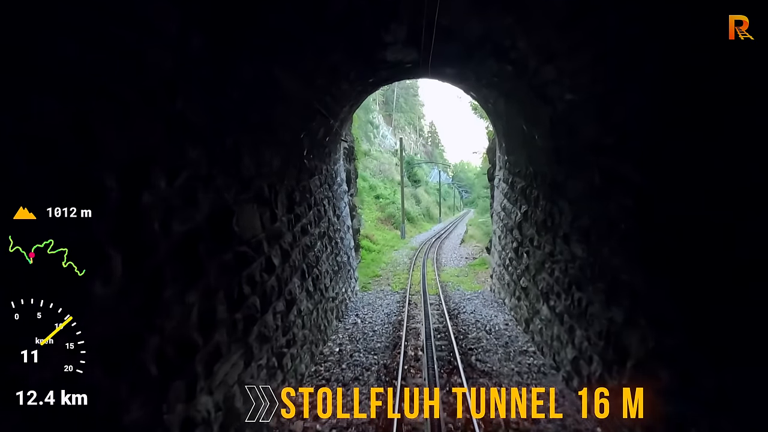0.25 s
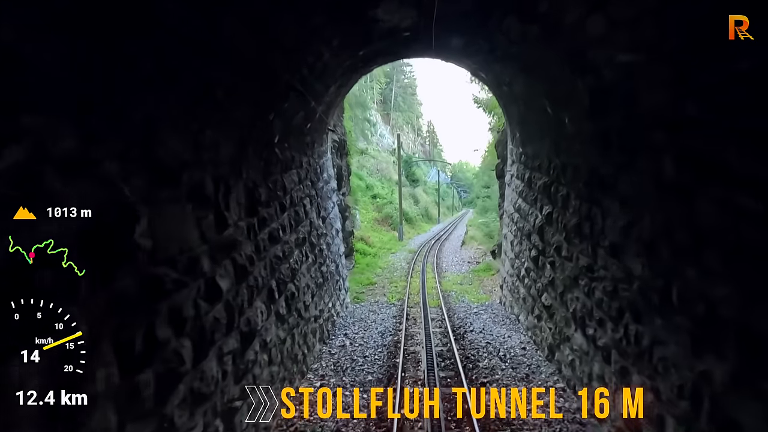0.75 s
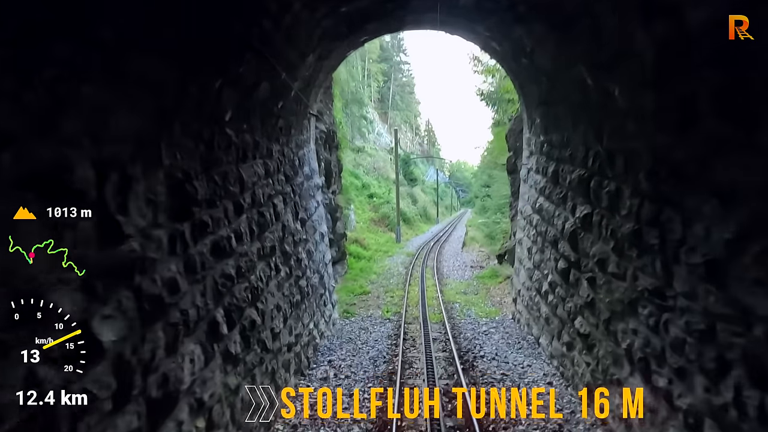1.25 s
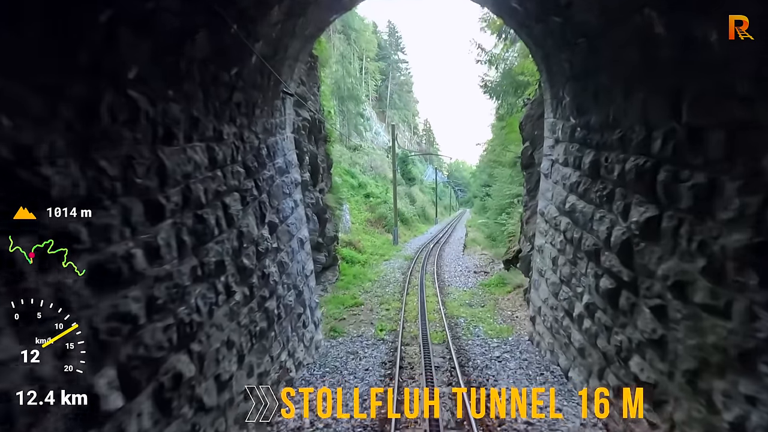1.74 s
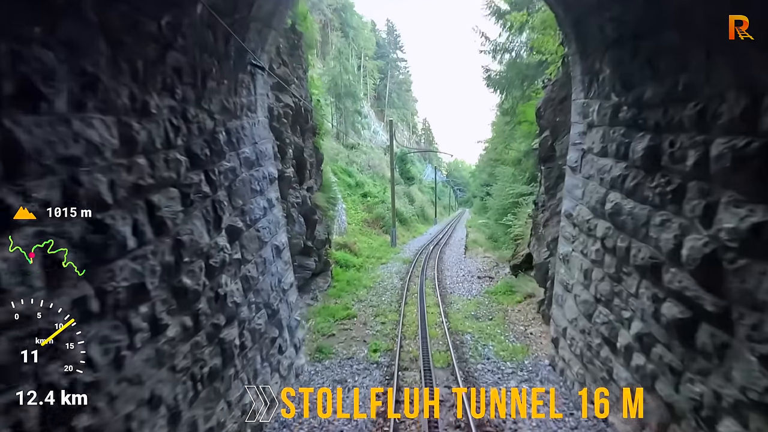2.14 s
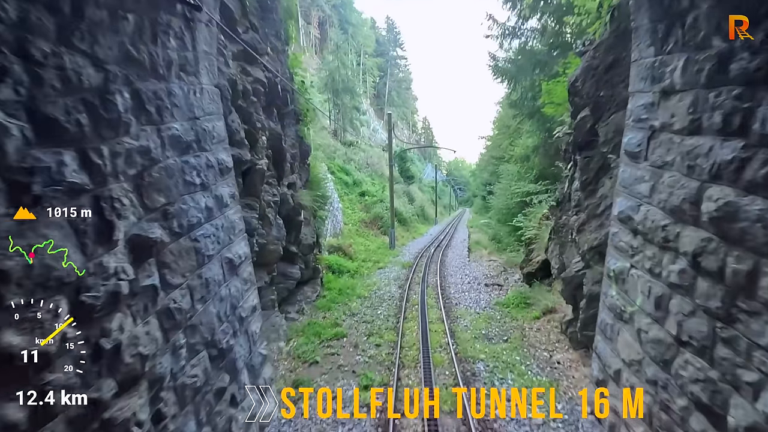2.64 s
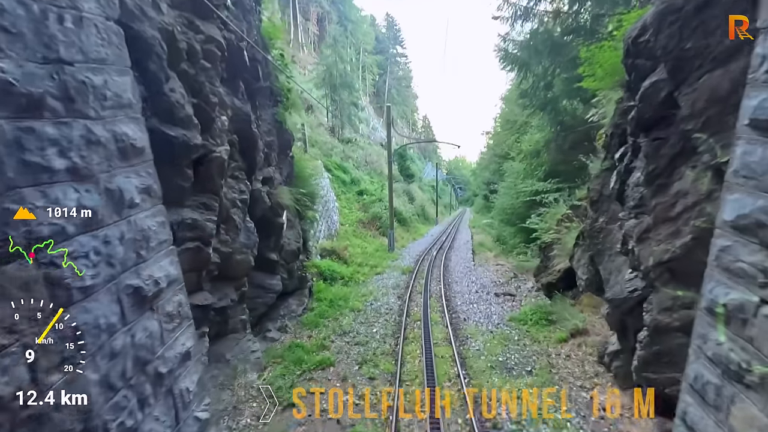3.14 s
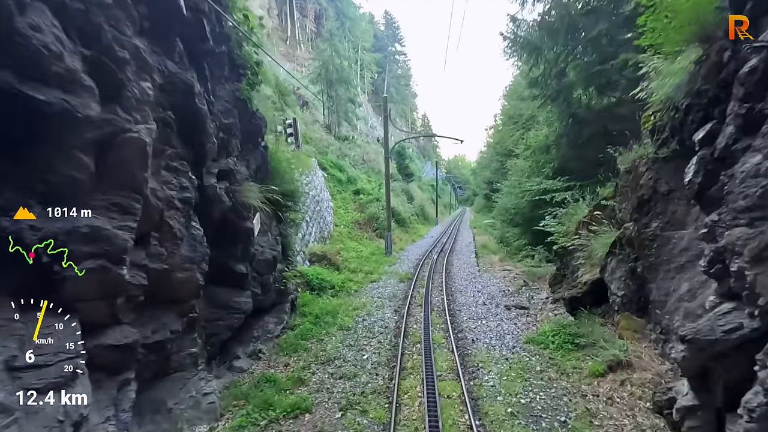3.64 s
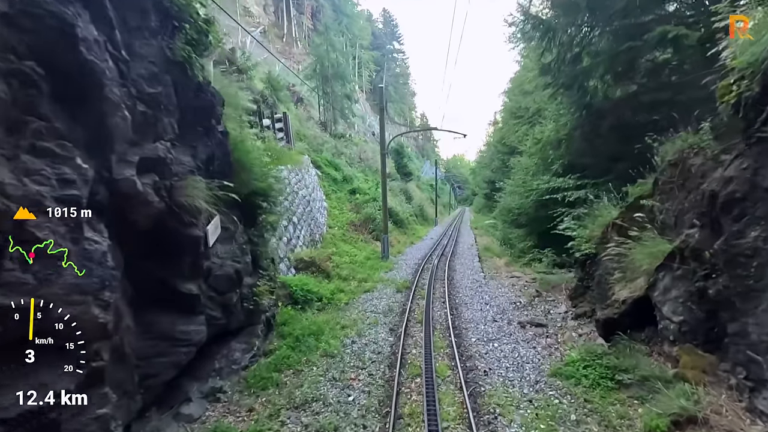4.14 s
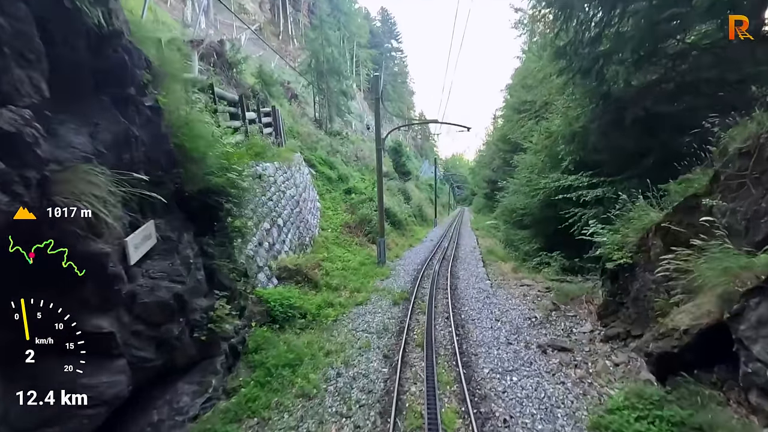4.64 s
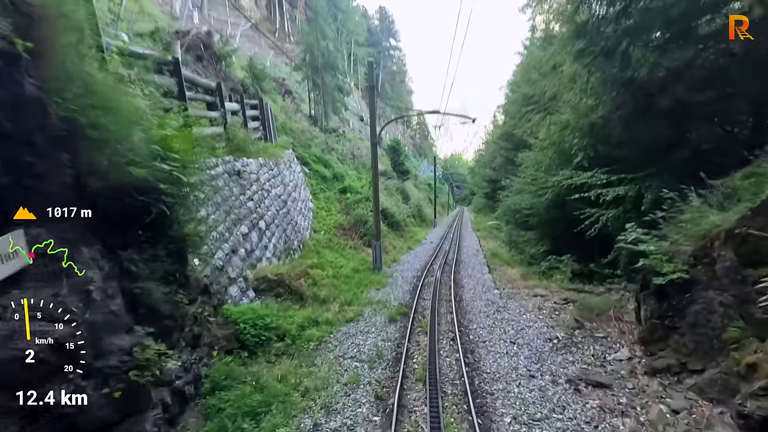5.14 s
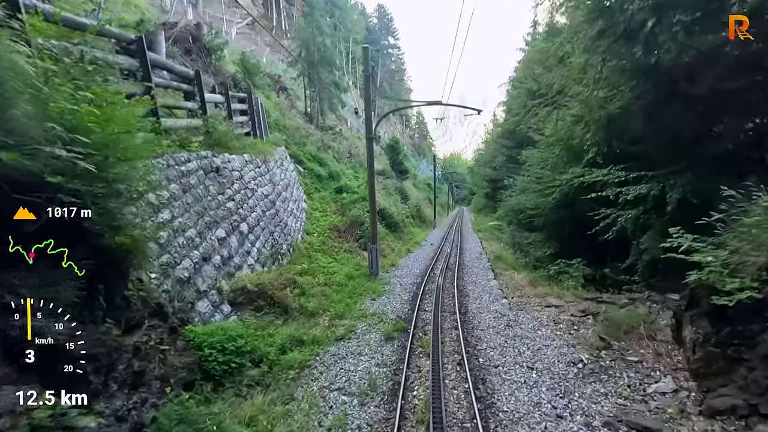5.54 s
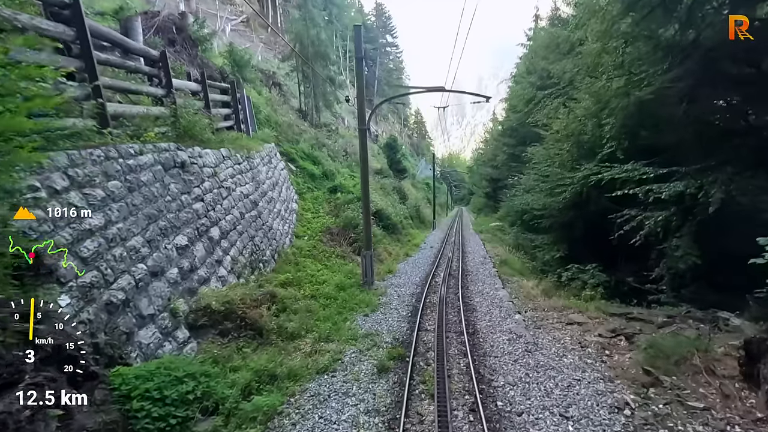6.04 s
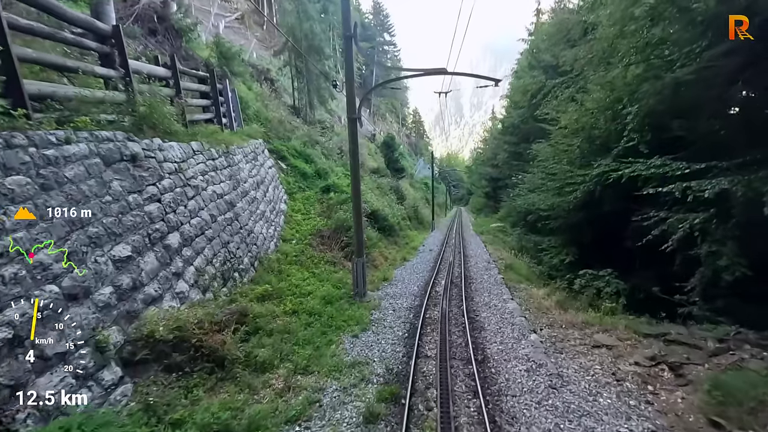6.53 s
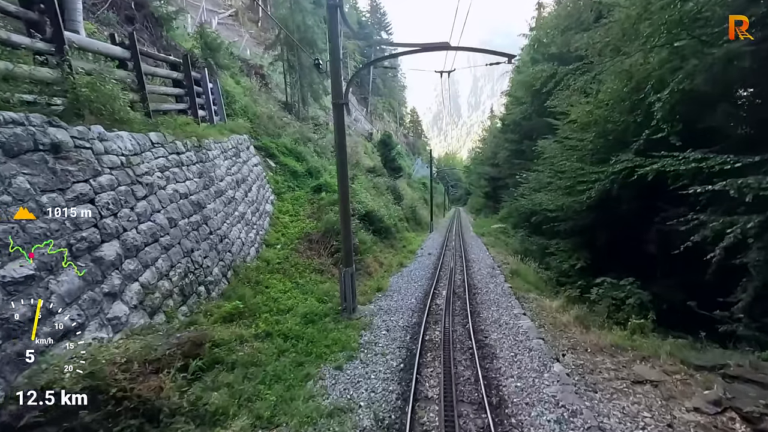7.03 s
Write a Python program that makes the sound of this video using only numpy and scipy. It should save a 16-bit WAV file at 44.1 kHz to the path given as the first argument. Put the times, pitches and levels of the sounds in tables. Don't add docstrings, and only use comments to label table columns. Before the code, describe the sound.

Inside the small cab of an electric rack railcar running steadily, a deep rumble and low, throbbing gear hum fill the background, with a faint fan whine behind. Close by, a loose metal fitting ticks irregularly, then chatters in three quick bursts, around three, five and nearly seven seconds. The cab adds a very short echo, and the close microphone sounds thick and compressed in the bass.

```python
import sys
import numpy as np
from scipy import signal
from scipy.fft import rfft, irfft
from scipy.io import wavfile
from scipy.ndimage import uniform_filter1d

SR = 44100
rng = np.random.default_rng(int(sys.argv[2]) if len(sys.argv) > 2 else 0)


def ratio_of_db(decibels):
    return 10 ** (np.asarray(decibels, float) / 20)


def transcribe(u):
    v = np.clip(np.atleast_2d(u).T, -1, 1)
    q = np.round(v * 32767).astype(np.int16)
    wavfile.write(sys.argv[1], SR, q)


N = 321048

# pitch_hz [Hz], density_db [dB per Hz]
BODY_RUMBLE = [(8.8, -14), (15, -4), (43, -0.5), (86, -2.5), (133, -2), (237, -4.5), (619, -13.5),
               (716, -18.5), (1610, -28.5), (2570, -37), (3860, -36), (4210, -40), (6710, -55),
               (8710, -62.5), (15600, -81)]
# pitch_hz [Hz], width_hz [Hz], level_db [dB]
BODY_RINGS = [
    (35.8, 14, -30),
    (340.7, 35, -27),
    (15420, 200, -80.5),
]

# peak_s [s], length_s [s], level_db [dB]
MESH_SECOND = [(0.38, 0.78, -18.5), (0.95, 0.87, -16.5), (2.08, 0.75, -15.5), (2.9, 1.1, -22),
               (3.8, 0.38, -15.5), (4.65, 0.58, -27), (5.3, 0.75, -26), (6.1, 1.22, -23)]
MESH_THIRD = [(0.0, 0.43, -18.5), (1.75, 0.97, -18.5), (2.7, 0.98, -16.5), (3.6, 0.59, -17.5),
              (4.1, 0.78, -17.5), (5.1, 0.98, -20.5), (5.95, 1.4, -18), (6.8, 0.55, -19.5),
              (7.15, 0.45, -16.5)]
MESH_FOURTH = [(0.55, 0.71, -20), (1.7, 1.16, -22.5), (2.4, 0.49, -21), (2.95, 1.08, -22.5),
               (3.8, 1.07, -21), (4.65, 1.14, -19.5), (6.1, 0.87, -21.5), (7.1, 0.52, -18.5)]
# peak_s [s], length_s [s], level_db [dB]
PINION_SWELLS = [(0.95, 0.89, -29.5), (1.7, 0.4, -33), (2.45, 0.63, -28.5), (3.0, 0.87, -33), (3.9, 1, -30),
                 (6.6, 0.35, -35.5)]

# pitch_hz [Hz], width_hz [Hz], level_db [dB]
FITTING_MODES = [(1166, 48, 2.5), (1261.5, 53, 9), (1652, 34, 4.5), (1670, 63, -15.5), (1800, 63, -12),
                 (2016, 15, -6), (2460, 24, -32.5), (2600, 17, -1), (3176, 110, -3), (3470, 26, 4),
                 (3620, 46, 1.5), (3674, 82, 5), (3920, 79, -20), (4498, 81, -1), (5050, 62, -6.5),
                 (5250, 26, -16), (5715, 89, -6.5), (5990, 56, -13.5)]
# pitch_hz [Hz], width_hz [Hz], level_db [dB]
SIZZLE_MODES = [(9450, 190, -34), (9700, 170, -33), (10700, 870, -37), (12200, 600, -38), (13900, 700, -39)]
# pitch_hz [Hz], density_db [dB per Hz]
FITTING_WASH = [(600, -42), (1000, -10), (1250, 1), (1450, -16), (1800, -2), (3600, -5), (4800, -4.5),
                (5700, -10.5), (6800, -29), (8300, -31), (10000, -27), (13000, -33.5), (15700, -40.5)]
# peak_s [s], length_s [s], level_db [dB]
JOLTS = [
    (0.55, 1.2, -41.5),
    (2.2, 1.27, -40.5),
    (3.3, 0.82, -31.5),
    (3.95, 0.89, -47),
    (4.45, 0.43, -41.5),
    (5.25, 0.97, -34.5),
    (6.8, 0.57, -31.5),
    (7.28, 0.63, -47.5),
]
# start_s [s], peak_db
# [dB], low_modes_db [dB], sizzle_db [dB], chatter_s [s]
RATTLES = [(2.9856, -13.5, -10, -34, 0.012), (3.0585, -16, 2, -31, 0.013), (3.074, -16, -3, -26, 0.01),
           (3.1214, -19, -5, -25, 0.018), (3.1348, -12.5, -11, -31, 0.014),
           (3.1968, -11, -4.5, -26, 0.0094), (3.253, -9, -10, -26, 0.015),
           (3.3164, -12.5, -0.5, -30.5, 0.016), (3.3867, -17.5, -5, -32.5, 0.015),
           (3.401, -15, 7, -26, 0.016), (3.42, -20, -4, -26.5, 0.015), (3.441, -8, -13, -29, 0.017),
           (3.4643, -11, -22, -34.5, 0.018), (3.4874, -19, -19, -31, 0.014), (3.6196, -19, -4, -31, 0.02),
           (4.8867, -15.5, -0.5, -34, 0.012), (4.9322, -25, -10, -26, 0.015),
            (4.9543, -18, -7, -29, 0.019), (5.029, -19.5, -8.5, -30, 0.016),
            (5.0435, -13, -5.5, -30, 0.012), (5.0956, -9.5, -4, -23.5, 0.019), (5.159, -8, -5, -26, 0.021),
            (5.2235, -9.5, -11.5, -25, 0.015), (5.235, -10, -9.5, -32.5, 0.01),
            (5.293, -13, -14, -29, 0.017), (5.3033, -12.5, -7, -30, 0.012),
            (5.3747, -15, -21, -27.5, 0.022), (5.3975, -17, -17, -25, 0.015),
            (5.4384, -25, -10, -24, 0.015),
           (6.567, -11.5, -14, -32, 0.011), (6.637, -14, -12.5, -28, 0.015),
            (6.6507, -19.5, -6, -33, 0.013), (6.7113, -13, -5, -34, 0.015), (6.7284, -16.5, 4, -28, 0.0085),
            (6.7807, -13.5, -5.5, -25.5, 0.015), (6.791, -12, -12, -22.5, 0.013),
            (6.8094, -18, 4, -20.5, 0.011), (6.8738, -15.5, -3, -32.5, 0.015),
            (6.8887, -16, -5, -30, 0.013), (6.934, -18.5, -10, -35, 0.011), (6.9706, -26.5, -16, -36, 0.02),
            (7.105, -22.5, -3.5, -33, 0.015), (7.1237, -21, -7, -30.5, 0.019)]
# start_s [s], peak_db [dB], sizzle_db [dB], chatter_s [s]
TICKS = [(0.159, -26, -35, 0.014), (0.3816, -16, -30.5, 0.01), (0.4707, -20, -31, 0.017),
         (0.4884, -25.5, -28.5, 0.014), (0.574, -20.5, -34, 0.018), (0.5925, -13.5, -33, 0.018),
         (0.8194, -29.5, -28, 0.012), (1.3844, -26, -28.5, 0.0088), (1.718, -24, -26.5, 0.01),
         (1.7978, -23, -33, 0.014), (1.8583, -20.5, -31.5, 0.016), (1.9744, -31, -27, 0.012),
         (2.1206, -26.5, -33, 0.022), (2.284, -18, -24.5, 0.015), (2.467, -21.5, -36.5, 0.025),
         (2.62, -27, -29.5, 0.018), (3.6884, -21.5, -38, 0.013), (3.7578, -23.5, -26, 0.012),
         (3.8434, -27, -32, 0.0087), (3.9998, -18.5, -27.5, 0.0099), (4.1633, -18.5, -33, 0.016),
         (4.3085, -19.5, -31.5, 0.016), (4.3975, -24, -32, 0.016), (4.6544, -19.5, -31, 0.0095),
         (5.688, -25, -27, 0.012), (6.108, -24.5, -36.5, 0.012), (6.2706, -25, -32, 0.011),
         (6.4477, -26.5, -37, 0.014), (6.5106, -22.5, -40, 0.013), (7.237, -22, -32, 0.0095)]

# pitch_hz [Hz], gain_db [dB]
MIC_PORT = [(20, -1.5), (8050, 0), (8300, -2.5), (11050, -0.5), (11280, -10), (11480, 4), (12500, 6.5),
            (12800, -2.5), (14000, 3.5), (15700, 3)]


def level(x, db):
    return x * ratio_of_db(db) / np.sqrt(np.mean(x ** 2))


def colour(x, spectrum):
    hz, db = np.transpose(spectrum)
    f = np.linspace(1, SR / 2, 8193)
    cepstrum = irfft(np.log(ratio_of_db(np.interp(np.log(f), np.log(hz), db))))
    cepstrum[1:8192] *= 2
    cepstrum[8193:] = 0
    impulse = irfft(np.exp(rfft(cepstrum)))
    return signal.oaconvolve(x, impulse)[:N]


def ring(x, hz, width_hz):
    return signal.lfilter(*signal.iirpeak(hz, hz / width_hz, fs=SR), x)


def walk(rate_hz):
    hold, steps = int(SR / rate_hz / 32), N // 32 + 1
    slow = np.repeat(rng.standard_normal(steps), hold)[:steps]
    slow = uniform_filter1d(uniform_filter1d(slow, hold), hold)
    return 1.3 * np.interp(np.arange(N) / 32, np.arange(steps), slow)


def swells(table, rest_db):
    t = np.arange(N) / SR
    total = ratio_of_db(rest_db)
    for peak_s, length_s, level_db in table:
        total = total + ratio_of_db(level_db) * np.cos(np.pi * np.clip((t - peak_s) / length_s, -0.5, 0.5))
    return 20 * np.log10(total)


def body():
    rumble = level(colour(rng.standard_normal(N), BODY_RUMBLE), -13.5)
    out = rumble * ratio_of_db(1.2 * walk(7.4))
    for hz, width_hz, db in BODY_RINGS:
        out += level(ring(ring(rng.standard_normal(N), hz, width_hz), hz, width_hz), db)
    return out


def fan():
    whine_hz, width_hz, whine_db = 3855, 110, -45.5
    phase = 2 * np.pi * np.cumsum(whine_hz * (1 + 0.002 * walk(1.5))) / SR
    return ratio_of_db(whine_db) * (walk(width_hz) * np.sin(phase) + walk(width_hz) * np.cos(phase))


def tone(hz, db, wander):
    phase = 2 * np.pi * np.cumsum(hz) / SR + wander * walk(12) + 0.92 * walk(1.227)
    return np.sqrt(2) * ratio_of_db(db) * np.sin(phase)


def drive():
    mesh_hz, pinion_hz = 58.1, 638.6
    missing_speed, catch_up_s = 0.004, 3.8
    speed = 1 + 0.001 * walk(1.5) - missing_speed * (np.arange(N) < catch_up_s * SR)
    levels = [-23]
    levels += [swells(table, rest_db=-35.5) for table in (MESH_SECOND, MESH_THIRD, MESH_FOURTH)]
    mesh = sum(tone(k * mesh_hz * speed, db, wander=0.37) for k, db in enumerate(levels, 1))
    return mesh + tone(pinion_hz * speed, swells(PINION_SWELLS, rest_db=-51), wander=0.75)


def blows():
    ticks = [(s, peak_db + 1, -4.5, sizzle_db, chatter_s) for s, peak_db, sizzle_db, chatter_s in TICKS]
    return np.transpose(sorted([*RATTLES, *ticks]))


def bursts(gain_db):
    rise_s, blow_db = 0.0032, 2.5
    force, t = np.zeros(N + SR), np.arange(SR // 8) / SR
    start_s, chatter_s = blows()[[0, 4]]
    for s, hold_s, db in zip(start_s, chatter_s, gain_db + blow_db):
        fade = np.exp(-(t / max(hold_s, 0.002)) ** 1.13)
        force[int(s * SR):][:len(t)] += ratio_of_db(db) * (1 - np.exp(-t / rise_s)) * fade
    return force[:N]


def cab(dry, seat):
    t60_s = 0.14
    t = np.arange(SR // 4) / SR
    echoes = rng.standard_normal((seat.max() + 1, len(t))) * ratio_of_db(-60 * t / t60_s) * (t > 0.002)
    tail = np.zeros(N)
    for k, echo in enumerate(echoes):
        tail += signal.oaconvolve(dry * (seat == k), echo / np.sqrt(np.sum(echo ** 2)))[:N]
    return tail


def fitting():
    start_s, peak_db, low_db, sizzle_db = blows()[:4]
    taps = (rng.random(N) < 2500 / SR) * rng.standard_normal(N) * ratio_of_db(1.5 * rng.exponential(size=N))
    taps = level(taps + 0.28 * rng.standard_normal(N), 0)
    jingle = ratio_of_db(swells(JOLTS, rest_db=-52) + 2.9 * walk(14))

    shares = ((0.95, low_db - 6), (0.67, -10.0), (0.59, sizzle_db + 19.0))
    force = [taps * (share * jingle + bursts(peak_db + db)) for share, db in shares]
    edges_hz = [2250, 8000]

    all_modes = FITTING_MODES + SIZZLE_MODES
    blow = np.clip(np.searchsorted(start_s * SR, np.arange(N)) - 1, 0, None)
    mix = ratio_of_db(3.0 * rng.standard_normal((len(start_s), len(all_modes))))
    modes = np.zeros(N)
    for k, (hz, width_hz, db) in enumerate(all_modes):
        push = force[np.searchsorted(edges_hz, hz)] * ratio_of_db(db) * mix[blow, k]
        modes += (-1) ** k * ring(push, hz, max(width_hz, 48.0))

    bands = ((edges_hz[0], "low"), (edges_hz, "band"), (edges_hz[1], "high"))
    rub = np.zeros(N)
    for (edge_hz, kind), band_force in zip(bands, force):
        rub += signal.sosfilt(signal.butter(3, edge_hz, kind, fs=SR, output="sos"), band_force)
    dry = ratio_of_db(12.0) * modes + ratio_of_db(12.0) * colour(rub, FITTING_WASH)
    return dry + ratio_of_db(-8.5) * cab(dry, seat=blow % 5)


def scene():
    return (body() + fan() + drive() + fitting())[None]


def low_pass(x):
    return signal.sosfilt(signal.butter(12, 15730, fs=SR, output="sos"), x)


def record(dry):
    hiss = level(rng.standard_normal(N), -64.5)
    heard = colour(dry[0] + hiss, MIC_PORT)[None]
    loudness = np.sqrt(uniform_filter1d(heard ** 2, int(0.021 * SR)))
    even = heard * (loudness / 0.2) ** -0.25
    rounded = np.tanh(0.75 * even) / 0.86
    top_cut = signal.ellip(10, 0.2, 70, 15880, fs=SR, output="sos")
    return low_pass(signal.sosfilt(top_cut, rounded))


dry = scene()
out = record(dry)
transcribe(out)
```